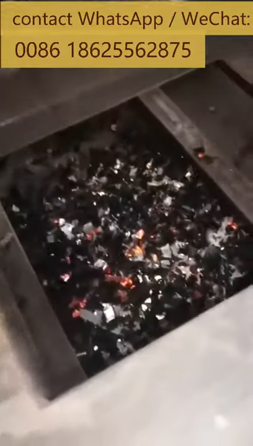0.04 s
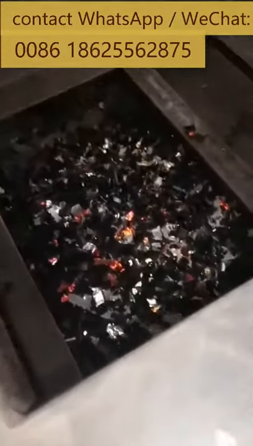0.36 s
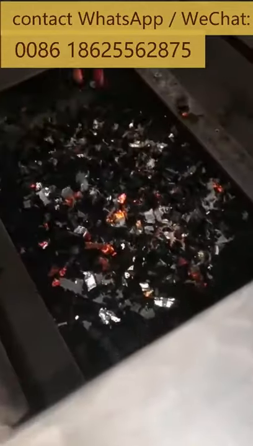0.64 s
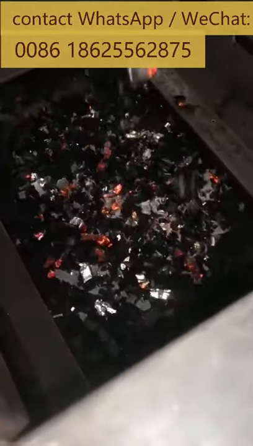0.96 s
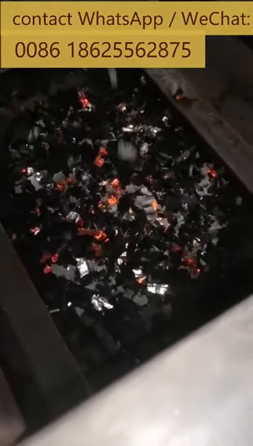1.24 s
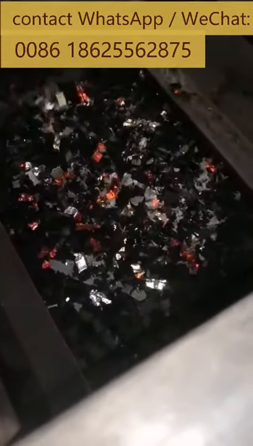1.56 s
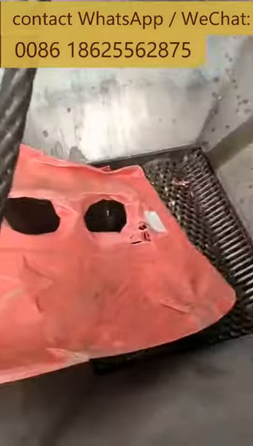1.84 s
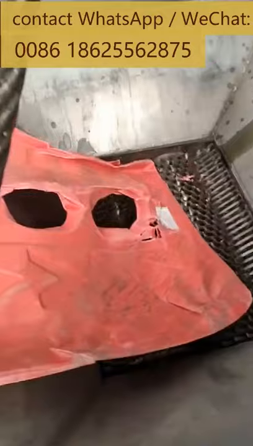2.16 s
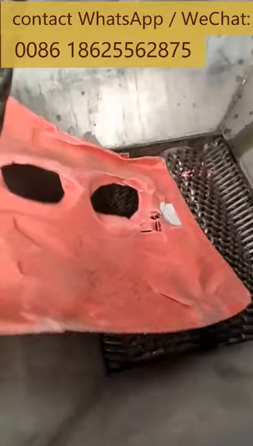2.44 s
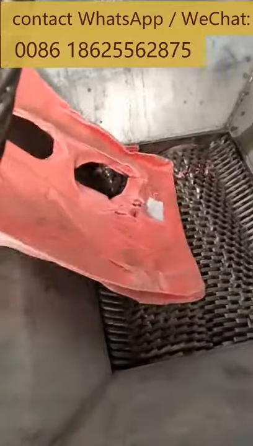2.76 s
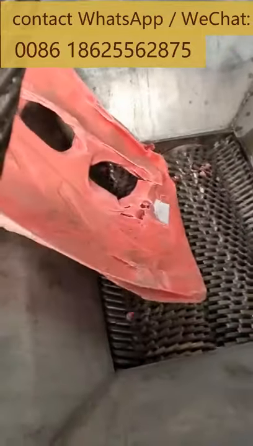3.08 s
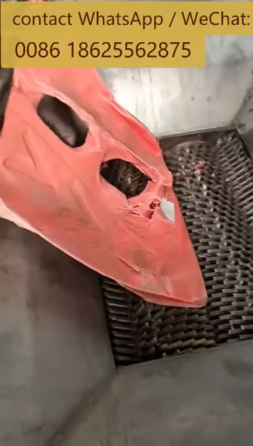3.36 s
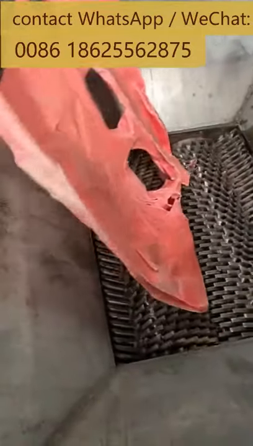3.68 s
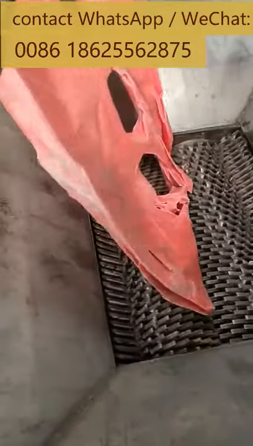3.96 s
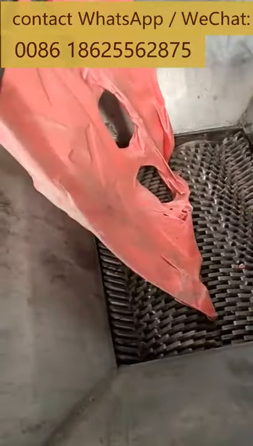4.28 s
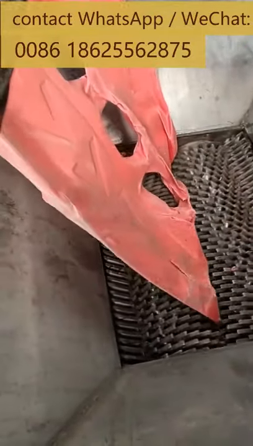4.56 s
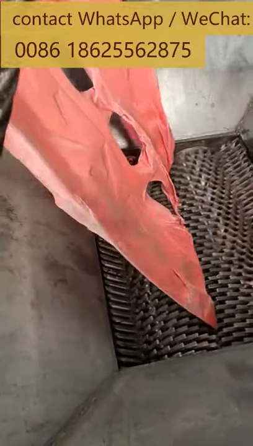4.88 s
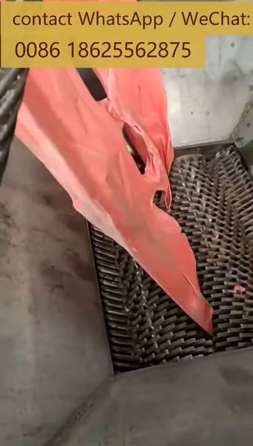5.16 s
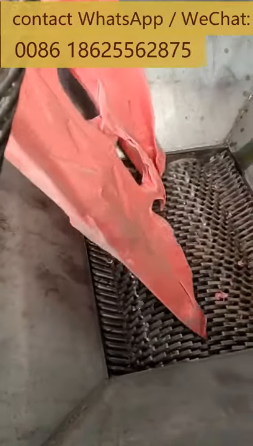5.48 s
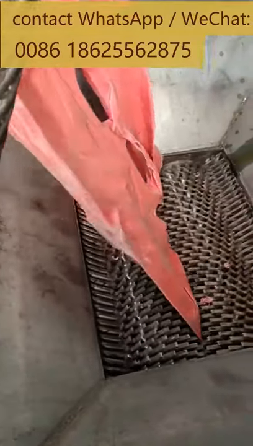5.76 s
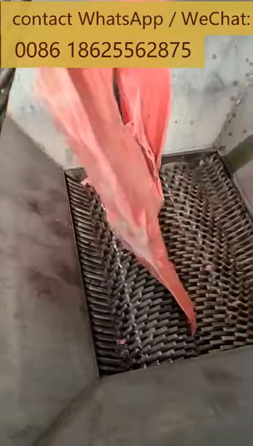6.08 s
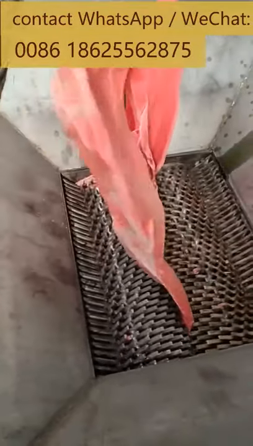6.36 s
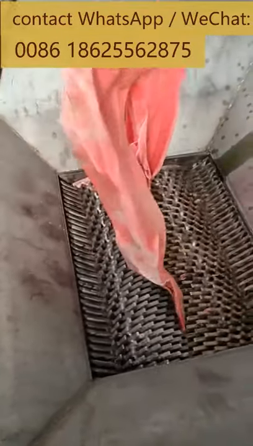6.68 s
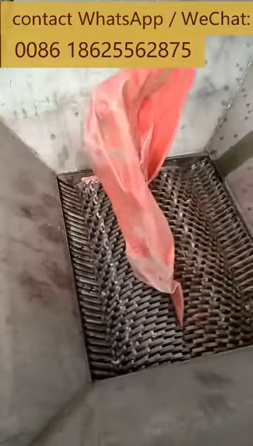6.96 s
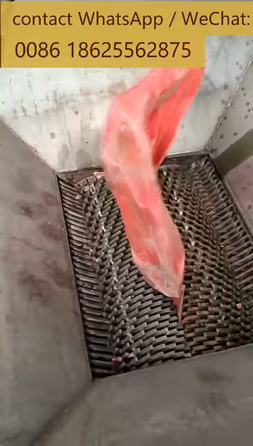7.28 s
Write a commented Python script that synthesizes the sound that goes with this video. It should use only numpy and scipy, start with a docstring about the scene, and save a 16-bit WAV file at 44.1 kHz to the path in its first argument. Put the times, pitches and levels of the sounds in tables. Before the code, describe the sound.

From the start, an industrial shredder drones low and steady while loose plastic flakes rattle in its chamber. Lumps shatter in short showers at the opening and around 0.8 and 1.3 seconds; a last one rings on the steel just before the sound cuts to silence at 1.7 seconds. At about 1.9 seconds a second shredder swells in, heard from the rim of its steel hopper in a factory hall. A large plastic sheet rumbles on the rotor with booming throbs, over a motor hum and a thin, steady whine. Around 3 seconds the teeth catch the sheet and the deep rumble starts to fade. High, fluttering squeals come between 3.2 and 4.2 seconds. Dense, irregular cracking, crunching and grinding continue until the end at about 7.6 seconds, with hollow knocks against the steel, strongest near 5.1, 5.7, 7.1 and 7.5 seconds.

```python
"""A plastic shredder drags in a large sheet, heard from the rim of its steel hopper in a factory hall.
The sheet rumbles on the rotor, knocks and squeals against the steel, then cracks and crunches in the
teeth, over the boom of the hopper and the thin whine of the drive. Before it, ending in a short silence,
another shredder drones as its knives pass, while lumps shatter and loose flakes rattle in its chamber."""
import sys
import numpy as np
from scipy import signal
from scipy.fft import rfft, irfft, next_fast_len
from scipy.io import wavfile
from scipy.ndimage import uniform_filter1d

SR = 44100
rng = np.random.default_rng(int(sys.argv[2]) if len(sys.argv) > 2 else 0)


def put_to_file(sound):
    """Save the sound as 16-bit audio at rate SR, in the file named by the first command-line argument."""
    columns = np.atleast_2d(sound).T  # one column per channel
    safe = np.clip(columns, -1, 1)
    whole_steps = np.round(safe * 32767)
    wavfile.write(sys.argv[1], SR, whole_steps.astype(np.int16))


N = 332073
TIME = np.arange(N) / SR
FIRST_SPAN_S, SECOND_SPAN_S = (-0.1, 1.668), (1.915, 7.7)
CAUGHT_S = 3.08  # the teeth catch the sheet


def amp(db):
    return 10 ** (np.asarray(db) / 20)


def unit(x):
    """Scales to rms 1."""
    return x / np.sqrt(np.mean(x ** 2) + 1e-20)


def at_hz(points, hz):
    """Reads a spectrum on a log-frequency axis."""
    f, value = np.transpose(points)
    return np.interp(np.log(hz + 1), np.log(f + 1), value)


def controls(rows):
    """Columns of a curve table at every sample."""
    s, *columns = np.transpose(rows)
    return [np.interp(TIME, s, c) for c in columns]


def add(mix, s, sound):
    """Adds a stereo sound from time s on."""
    part = mix[:, max(round(s * SR), 0):][:, :sound.shape[1]]
    part += sound[:, :part.shape[1]]


def drift(per_s):
    """Slow random curve of rms 1, changing up to per_s times a second."""
    size, rate_hz = 4096, 500
    hz = np.fft.rfftfreq(size, 1 / rate_hz)
    slow = irfft(rfft(rng.standard_normal(size)) / (1 + (hz / per_s) ** 4))
    return np.interp(TIME * rate_hz, np.arange(size), unit(slow))


def steady(x, smooth_s):
    """Evens out stereo power over spans longer than smooth_s."""
    size = int(smooth_s * SR)
    return x / np.sqrt(uniform_filter1d(uniform_filter1d((x ** 2).mean(0), size), size) + 1e-9)


def during(span_s):
    """Gate with 3 ms edges."""
    return np.clip(np.minimum(TIME - span_s[0], span_s[1] - TIME) / .003, 0, 1)


def struck(s, rise_s, fade_s):
    """Envelope: quick rise at time s, then decay."""
    age_s = np.maximum(TIME - s, 0)
    return (1 - np.exp(-age_s / rise_s)) * np.exp(-age_s / fade_s)


def swell_db(depth_db, rise_s):
    """Fade-in of the second machine."""
    return depth_db * np.exp(-abs(TIME - SECOND_SPAN_S[0]) / rise_s)


# left-right likeness: (frequency [Hz], coherence [0-1])
COHERENCE = [(60, 0.98), (130, 1), (290, 0.79), (640, 0.34), (3100, 0), (6800, 0)]

def colour(x, spectrum):
    """Minimum-phase filter, unit power gain on white noise; long waves reach both sides alike."""
    size = 2 * next_fast_len(N // 2 + 8192)
    hz = np.fft.rfftfreq(size, 1 / SR)
    gain = unit(amp(at_hz(spectrum, hz)))
    cepstrum = irfft(np.log(gain + 1e-6))
    cepstrum[1:size // 2] *= 2
    cepstrum[size // 2 + 1:] = 0
    left, other = rfft(x, size) * np.exp(rfft(cepstrum))
    same = np.clip(at_hz(COHERENCE, hz), -1, 1)
    right = same * left + np.sqrt(1 - same ** 2) * other
    return irfft(np.array([left, right]), size)[:, :N]


def hopper(x, t60_s=.33):
    """Short diffuse tail of reflections between the steel walls."""
    t = TIME[:SR // 2]
    tail = rng.standard_normal((2, len(t))) * amp(-60 * t / t60_s)
    return signal.fftconvolve(x, tail / np.linalg.norm(tail[0]), axes=1)[:, :N]


def impacts(per_s, spread_db, ring_s, bed):
    """Many small uneven blows, each scattered between the walls, over a smooth noise bed."""
    sizes = amp(spread_db * np.minimum(rng.exponential(1, N), 4)) * (rng.random(N) < per_s / SR)
    power = signal.lfilter([1], [1, -np.exp(-2 / (ring_s * SR))], sizes ** 2)
    return unit(np.sqrt(power / power.mean() + bed) * rng.standard_normal((2, N)))


def pings(per_s, low_hz, high_hz, cycles, spread_db):
    """Knocked loose pieces ring for a few cycles and echo off the near walls."""
    out, t = np.zeros((2, N)), TIME[:int(np.pi * cycles / low_hz * SR)]
    for when, pitch, size, left, right in rng.random((int(per_s * N / SR), 5)):
        hz = low_hz * (high_hz / low_hz) ** pitch
        angle = 2 * np.pi * (hz * t + np.array([[left], [right]]) / 2)
        ring = np.exp(-hz * t / cycles) * (1 - np.exp(-2 * hz * t))
        add(out, when * N / SR, amp(spread_db * size ** 3) * ring * np.sin(angle))
    return unit(out + .5 * hopper(out, t60_s=.06))


def fractures(times_s, levels_db, pitches_hz, ring_s, tail_s, tail_db, piece_db, click):
    """Each fracture: faint strain crackle, hard click, tearing, echoes; the broken piece rings."""
    out, lead_s = np.zeros((2, N)), .02
    t = TIME[:SR // 6] - lead_s
    strain = amp(-17) * np.exp(-abs(t) / .01)
    burst = np.exp(-abs(t) / ring_s) + amp(tail_db) * np.exp(-abs(t) / tail_s)
    shape = np.where(t < 0, strain, burst)
    for s, db, hz in zip(times_s, levels_db, pitches_hz):
        roughness = unit(uniform_filter1d(rng.standard_normal(len(t)), size=60))
        tearing = amp(2.3 * np.minimum(abs(t) / .0043, 1) * roughness)
        crack = shape * tearing * rng.standard_normal((2, len(t)))
        arrivals = round(lead_s * SR) + rng.integers(0, 6, size=2)
        crack[[0, 1], arrivals] += click * np.linalg.norm(crack[0])
        piece = signal.lfilter(*signal.iirpeak(hz, Q=4.5, fs=SR), crack)
        add(out, s - lead_s, amp(db) * unit(crack) + amp(db + piece_db) * piece / crack.std())
    return out


# gear whine, listener moving through its standing waves:
# (time [s], left level [dB], right level [dB], left lead [rad])
WHINE = [(2.1, -25.5, -23.5, 2), (2.6, -23.3, -22.7, 2.3), (3.6, -24.3, -23.5, 2.4), (4.8, -27, -22.5, 2.6),
         (5.2, -27.3, -21.7, 1.1), (6.2, -28, -23.8, 1.9), (6.8, -24.8, -25.2, 1.1), (7.5, -19.5, -23, .8)]
# motor and gear hum: (frequency [Hz], level [dB])
HUM = [(75.3, -63), (153, -35.5), (226, -38.5), (302, -39), (377, -48), (829, -41)]

def drive(whine_hz=925.7):
    """Second machine: gear whine reaches each side by its own paths, over a wavering hum."""
    left_db, right_db, lead_rad = controls(WHINE)
    angle = 2 * np.pi * whine_hz * TIME + .68 * drift(per_s=.4)
    whine = np.array([amp(db + 1.7 * drift(per_s=20)) * np.sin(angle + shift)
                      for db, shift in ((left_db, lead_rad), (right_db, 0))])
    hum = sum(amp(db + 2 * drift(per_s=18)) * np.sin(2 * np.pi * hz * TIME + 1.2 * drift(per_s=10))
              for hz, db in HUM)
    return np.sqrt(2) * amp(swell_db(depth_db=-23.5, rise_s=.11)) * (whine + hum)


# heavy bounces of the sheet: (time [s], level [dB])
HEAVES = [(2.125, -15), (2.245, -12), (2.51, -14.5), (2.815, -12), (3.2, -14.5)]

def boom(band_hz=(46, 80), fade_db_per_s=8, throb_hz=69, heave_s=.05):
    """The hopper's lowest modes boom, fading once the sheet is caught; heavy bounces make it throb."""
    band = signal.butter(3, band_hz, "band", fs=SR, output="sos")
    modes = unit(signal.sosfilt(band, rng.standard_normal(N)))
    level_db = -24.5 + swell_db(depth_db=-15, rise_s=.1) - fade_db_per_s * np.maximum(TIME - CAUGHT_S, 0)
    throb = sum(amp(db) * np.exp(-((TIME - s) / heave_s) ** 2) for s, db in HEAVES)
    return amp(level_db) * modes + throb * np.sin(2 * np.pi * (throb_hz * TIME + rng.random()))


# shattering lumps: (time [s], level [dB])
LUMPS = [(-.02, -22), (0.05, -17.5), (.16, -27), (.26, -26), (.755, -20.5), (.845, -22), (1.29, -18.5),
         (1.616, -18.5)]
# flake shower: (frequency [Hz], relative density [dB])
SHOWER_SPECTRUM = [(400, 2), (1100, 0.5), (2300, 0.5), (3200, -12), (5500, -20), (12000, -42.5)]
# steel modes: (frequency [Hz], level [dB])
CLANG_MODES = [(900, -28), (1180, -28), (1919, -18.5), (2150, -26)]

def lumps():
    """Each lump bursts into a shower of flakes; the last also strikes the steel, which rings."""
    bursts = sum(amp(db) * struck(s, rise_s=.01, fade_s=.11) for s, db in LUMPS)
    rattle = steady(pings(per_s=600, low_hz=1050, high_hz=2600, cycles=6, spread_db=8), smooth_s=.02)
    spray = steady(impacts(per_s=600, spread_db=3, ring_s=.004, bed=.3), smooth_s=.015)
    shower = amp(-3) * rattle + amp(-1.5) * colour(spray, SHOWER_SPECTRUM)
    clang = sum(amp(db) * np.sin(2 * np.pi * hz * TIME + rng.standard_normal((2, 1)) / 2)
                for hz, db in CLANG_MODES)
    return bursts * shower + struck(LUMPS[-1][0], rise_s=.003, fade_s=.12) * clang


# loose flakes: (frequency [Hz], relative density [dB])
FLAKE_SPECTRUM = [(200, -4), (520, -0.5), (680, -5.5), (950, 1.5), (1180, 1), (1500, -0.5), (1900, 2.5),
                  (2300, -5.5), (3100, -13.5), (5500, -18), (8200, -26), (9200, -29.5), (12500, -44),
                  (15500, -58.5)]

def flakes():
    """Loose flakes rattle in the first machine's chamber."""
    return amp(-24.3) * colour(impacts(per_s=1000, spread_db=2.2, ring_s=.008, bed=.6), FLAKE_SPECTRUM)


# rotor drone: (harmonic [x rotor speed], relative level [dB])
DRONE_HARMONICS = [(1, -13), (2, -9.5), (4, -10.5), (5, -18), (6, -0.5), (7, -17.5), (8, -7.5), (9, -10.5),
                   (10, -18), (11, -14), (12, -24), (13, -17.5), (14, -18), (17, -36), (19, -21.5)]
# knife-pass tone: (time [s], gain [dB])
KNIFE_GAIN = [(.06, 4.5), (.17, -6.5), (.28, -4), (.42, 2.5), (1.02, 3.5), (1.27, -1), (1.5, 3.5)]
# chamber noise: (frequency [Hz], relative density [dB])
CHAMBER_SPECTRUM = [(25, -79), (65, -4), (110, -13.5), (170, -4.5), (225, -10), (290, -8), (430, -20),
                    (700, -57), (1500, -70.5)]

def rotor(rotor_hz=24.99, knives=6, churn_db_per_db=.35):
    """First machine: passing knives drive the drone; a lump that damps their tone churns the chamber."""
    turns = rotor_hz * TIME + .006 * drift(per_s=3)
    knife_db = controls(KNIFE_GAIN)[0]
    drone = np.zeros(N)
    for k, db in DRONE_HARMONICS:
        level_db = db + (k == knives) * knife_db + 1.5 * drift(per_s=14)
        drone += amp(level_db) * np.sin(2 * np.pi * (k * turns + rng.random()))
    chamber = colour(impacts(per_s=190, spread_db=-1, ring_s=.0067, bed=.52), CHAMBER_SPECTRUM)
    return amp(-16.8) * unit(drone) + amp(-25 - churn_db_per_db * knife_db) * chamber


def grip(settle_s=.42):
    """Hold of the teeth on the sheet, 0-1: free until caught, then settling."""
    return 1 - np.exp(-np.maximum(TIME - CAUGHT_S, 0) / settle_s)


def feed_gain(free_db, gripped_db, grip_power):
    """Swells in, then moves from the free to the gripped level."""
    start_db = swell_db(depth_db=-17, rise_s=.083)
    return amp(start_db + free_db + grip() ** grip_power * (gripped_db - free_db))


def bite(width_s=.047, full_db=-13):
    """Tooth load on the rotor, 0-1: builds towards each crack or knock, then lets go."""
    t = TIME[::100]
    load = sum(amp(db - full_db) * np.exp(-((t - s) / width_s) ** 2) for s, db, *_ in CRACKS + KNOCKS)
    return np.interp(TIME, t, np.tanh(load))


# sheet on the rotor: (frequency [Hz], relative density [dB])
BOUNCE_SPECTRUM = [(22, -40), (36, -11), (52, -3), (60, -5), (70, 1), (86, -6), (120, -6), (150, -3),
                   (190, -7), (260, -19), (400, -32), (900, -85)]

def rumble():
    """The sheet bounces on the rotor; once gripped it quietens, rising at each bite."""
    bounce = colour(impacts(per_s=84, spread_db=1, ring_s=.0071, bed=1), BOUNCE_SPECTRUM)
    gain = feed_gain(free_db=-14.8, gripped_db=-35 + 5 * bite(), grip_power=1)
    return gain * steady(bounce, smooth_s=.06)


# rotor under load: (frequency [Hz], relative density [dB])
GRIND_SPECTRUM = [(60, 0.5), (130, 5), (200, 5), (300, -4.5), (420, -1.5), (620, 1.5), (800, -1.5),
                  (1050, -8.5), (1400, -12.5), (2500, -19.5), (5000, -45)]

def grinding():
    """The teeth grind the sheet; from the first crack on, loose pieces knock about."""
    grind = colour(impacts(per_s=250, spread_db=3, ring_s=.006, bed=.7), GRIND_SPECTRUM)
    pieces = pings(per_s=35, low_hz=280, high_hz=1100, cycles=4, spread_db=14)
    loose = (TIME > CRACKS[0][0]) * amp(-8) * pieces
    return feed_gain(free_db=-24.5, gripped_db=-29, grip_power=.5) * (amp(-.83) * grind + loose)


# crumbs: (frequency [Hz], relative density [dB])
CRUMB_SPECTRUM = [(400, 11.5), (1100, 7.5), (1700, 6), (2600, 8), (3300, 3), (4000, -1.5), (4600, -11.5),
                  (5500, -2), (7100, 2.5), (8500, -5.5), (10300, -13.5), (13500, -15.5), (15500, -25)]
# splinters: (frequency [Hz], relative density [dB])
TICK_SPECTRUM = [(3500, -10.5), (5600, 3), (7100, 8), (10200, -12), (13500, -20), (15500, -15)]

def crunch():
    """Smooth rubbing turns to clumps of crumbs as the teeth grip; chips and splinters break off."""
    grains = steady(impacts(per_s=200, spread_db=3.4, ring_s=.008, bed=.3), smooth_s=.1)
    crumbs = colour(grains, CRUMB_SPECTRUM)
    rubbing = colour(rng.standard_normal((2, N)), CRUMB_SPECTRUM)
    chips = pings(per_s=60, low_hz=1200, high_hz=3400, cycles=3, spread_db=12)
    splinters = colour(impacts(per_s=16, spread_db=4, ring_s=.0008, bed=0), TICK_SPECTRUM)
    loose = (TIME > CRACKS[0][0]) * (amp(-11) * chips + amp(-17) * splinters)
    clumps = amp(1.8 * drift(per_s=18))
    texture = np.sqrt(grip()) * clumps * crumbs + np.sqrt(1 - grip()) * rubbing
    return feed_gain(free_db=-37.5, gripped_db=-30, grip_power=3) * (amp(1.5) * texture + loose)


# plastic slipping on steel: (time [s], length [s], level [dB], left minus right [dB])
SLIPS = [(3.233, 0.1, -18.5, 3.5), (3.347, 0.047, -21.5, 10), (3.439, 0.071, -22, 2),
         (3.516, 0.086, -21.5, -4), (3.579, 0.054, -25, 9.5), (3.629, 0.068, -35, 14),
         (3.751, 0.096, -25, -2), (3.846, 0.056, -28, 6), (3.89, 0.11, -29, 17), (4.124, 0.083, -27, 3)]
# squeal pitch: (time [s], frequency [Hz])
SQUEAL_PITCH = [(3.5, 5783), (4.05, 5768), (4.14, 5865), (4.21, 5795)]

def squeals():
    """Stick-slip locks on one high mode in fluttering bursts; a harder swing adds more octave."""
    bursts = sum(amp([[db + pan_db / 2], [db - pan_db / 2]])
                 * np.sin(np.pi * np.clip((TIME - s) / length_s, 0, 1))
                 for s, length_s, db, pan_db in SLIPS)
    swing = bursts * amp(1.8 * drift(per_s=80))
    hz = controls(SQUEAL_PITCH)[0] + 12 * drift(per_s=60)
    angle = 2 * np.pi * np.cumsum(hz) / SR + np.array([[2.1], [0]])
    return amp(4) * swing * np.sin(angle) + swing * swing.mean(0) * np.sin(2 * angle)


# sheet hitting the hopper: (time [s], level [dB], ring [Hz])
KNOCKS = [(3.073, -16.5, 260), (3.413, -15, 550), (3.422, -12.5, 693), (4.591, -12.5, 467),
          (4.941, -18, 590), (5.06, -13, 727), (5.0812, -10, 445), (5.098, -16, 295), (5.297, -15, 1000),
          (5.7003, -8.5, 798), (6.031, -13, 252), (6.172, -38, 283), (6.318, -12.5, 621), (6.326, -19, 252),
          (6.718, -19, 492), (7.108, -10.5, 750), (7.311, -16.5, 239), (7.49, -9.5, 600),
          (7.517, -11.5, 593)]
# thud of the sheet: (frequency [Hz], relative density [dB])
THUD_SPECTRUM = [(70, -80.5), (170, -1.5), (330, -4.5), (650, -1.5), (1000, -4), (1350, -25), (2500, -67)]

def sheet_knocks(bend_octaves=.628, bend_s=.00178, cycles=2.3, tail_s=.028):
    """Teeth knock the sheet on the hopper; fast bending waves arrive first, so its ring falls in pitch."""
    thuds = fractures(*np.transpose(KNOCKS), ring_s=.007, tail_s=.024, tail_db=-13, piece_db=0, click=.4)
    rings, t = np.zeros((2, N)), TIME[:SR // 7]
    for (s, db, hz), offsets in zip(KNOCKS, rng.standard_normal((len(KNOCKS), 2, 1))):
        falling_hz = hz * 2 ** bend_octaves / (1 + t / bend_s) ** .22
        angle = 2 * np.pi * np.cumsum(falling_hz) / SR + offsets / 2
        rise = 1 - np.exp(-4 * hz * t)
        fade = np.exp(-hz * t / cycles) + amp(-12.5) * np.exp(-t / tail_s)
        add(rings, s, amp(db) * rise * fade * np.sin(angle))
    return amp(-24) * colour(thuds, THUD_SPECTRUM) + rings + amp(-8) * hopper(rings, t60_s=.06)


# breaks in the sheet: (time [s], snap level [dB], splinter level [dB], piece ring [Hz])
CRACKS = [(2.955, -26.5, -31, 1120), (3.133, -23.5, -33, 1590), (3.184, -25.5, -33, 1840),
          (3.252, -29, -28.5, 2220), (3.311, -16.5, -28, 1800), (3.412, -16.5, -23, 1510),
          (3.512, -23.5, -32, 1350), (3.633, -25.5, -31, 1250), (3.707, -29.5, -28, 3000),
          (3.782, -24, -39, 2100), (3.789, -26, -28, 2620), (3.868, -27, -31, 2300),
          (3.965, -15, -44, 2230), (3.977, -23, -46, 2500), (4.184, -19.5, -29, 1380),
          (4.231, -29.5, -27, 2420), (4.263, -19.5, -25, 1490), (4.325, -28.5, -34, 2720),
          (4.391, -18, -24.5, 2620), (4.432, -27, -25.5, 2820), (4.524, -22, -29.5, 1620),
          (4.599, -28, -25.5, 1670), (4.645, -25, -34, 1640), (4.662, -22, -35, 2380),
          (4.676, -21.5, -29, 1670), (4.713, -27, -27, 1640), (4.814, -22.5, -66, 1840),
          (4.919, -22.5, -21.5, 2400), (4.961, -26.5, -34, 1780), (4.98, -26.5, -32, 1780),
          (5.005, -23, -34, 2550), (5.081, -24, -55, 2330), (5.2674, -18.5, -33, 1750),
          (5.281, -35, -26, 2400), (5.288, -22.5, -46, 2660), (5.356, -30.5, -28.5, 2050),
          (5.379, -18.5, -27.5, 2980), (5.419, -31, -37, 2200), (5.473, -20.5, -29.5, 2600),
          (5.516, -25, -27.5, 2800), (5.615, -24.5, -25, 1650), (5.7, -40, -43, 1390),
          (5.77, -31, -29, 1790), (5.85, -35, -48, 2100), (5.964, -25.5, -31, 2180),
          (6.008, -31, -32, 2500), (6.027, -21.5, -25.5, 2000), (6.091, -25.5, -27, 3130),
          (6.174, -16.5, -25.5, 2650), (6.264, -19, -27.5, 1830), (6.424, -29, -26, 2600),
          (6.437, -19.5, -25.5, 1130), (6.481, -17.5, -28, 2260), (6.519, -20.5, -35, 1520),
          (6.545, -23, -36, 2850), (6.669, -18, -29, 1800), (6.706, -17.5, -25, 1800),
          (6.711, -22, -24.5, 2800), (6.735, -28, -30, 2580), (6.789, -23.5, -51, 3070),
          (6.841, -19, -33, 2560), (6.899, -21, -27.5, 2350), (6.957, -25.5, -26, 3030),
          (7.011, -25, -31, 2220), (7.083, -18.5, -36, 1270), (7.11, -18.5, -33, 1840),
          (7.138, -20.5, -30, 2620), (7.161, -23, -31, 1210), (7.249, -21.5, -25.5, 2860),
          (7.267, -23, -30, 1700), (7.331, -20.5, -34, 1170), (7.514, -18.5, -30.5, 1300)]
# snap of a break: (frequency [Hz], relative density [dB])
SNAP_SPECTRUM = [(600, -16.5), (1300, 5), (2500, 6.5), (3200, 5), (3900, -5.5), (4600, -22.5), (7000, -69)]

def cracks():
    """Teeth break the sheet: it thuds, the fracture snaps slightly left, fine splinters tick."""
    s, snap_db, tick_db, hz = np.transpose(CRACKS)
    thud_db = snap_db - 6.5 + np.log2(hz / 2000)  # +1 dB per octave of piece ring
    thuds = fractures(s, thud_db, hz, ring_s=.008, tail_s=.024, tail_db=-12, piece_db=1, click=.3)
    snaps = fractures(s, snap_db, hz, ring_s=.005, tail_s=.015, tail_db=-18, piece_db=3, click=.4)
    ticks = fractures(s, tick_db, hz, ring_s=.008, tail_s=.025, tail_db=-17, piece_db=-10, click=.3)
    return (amp(-7.5) * colour(thuds, THUD_SPECTRUM)
            + amp([[-13.5], [-16]]) * colour(snaps, SNAP_SPECTRUM)
            + amp(-13) * colour(ticks, TICK_SPECTRUM))


def scene():
    """Two shredders, one after the other."""
    breaking = cracks() + sheet_knocks() + squeals()
    second = drive() + rumble() + grinding() + crunch() + boom() + breaking + amp(-9.5) * hopper(breaking)
    first = rotor() + flakes() + lumps()
    return during(FIRST_SPAN_S) * first + during(SECOND_SPAN_S) * second


def record(dry, ceiling=.9, cutoff_hz=15600):
    """Soft peak limiter, then low-pass."""
    rounded = dry / (1 + np.abs(dry / ceiling) ** 6) ** (1 / 6)
    lowpass = signal.firwin(511, cutoff_hz, window=("kaiser", 9), fs=SR)
    return signal.oaconvolve(rounded, lowpass[None], "same")


dry = scene()
out = record(dry)
put_to_file(out)
```